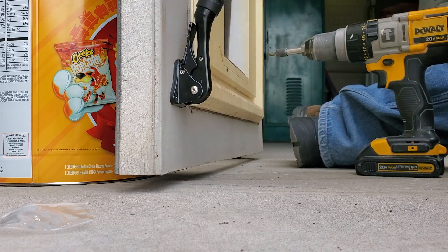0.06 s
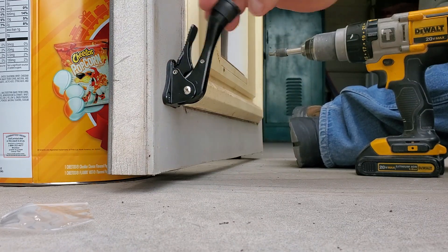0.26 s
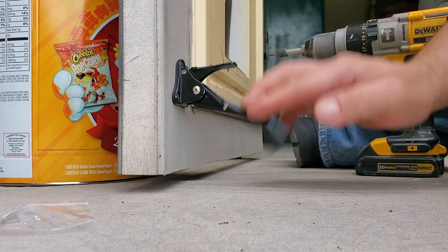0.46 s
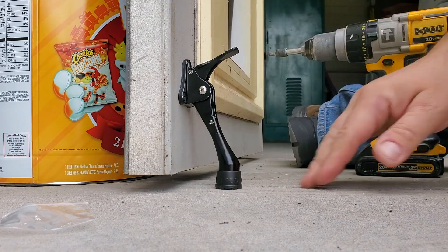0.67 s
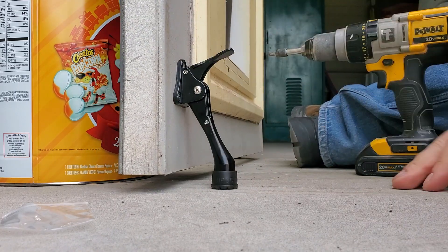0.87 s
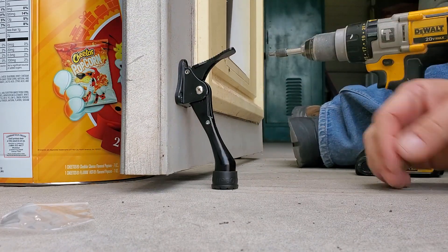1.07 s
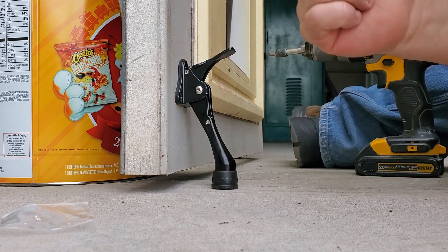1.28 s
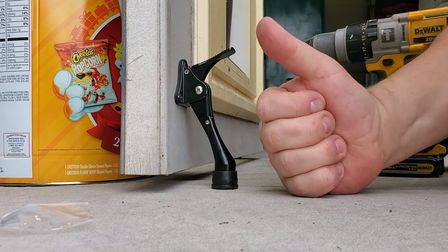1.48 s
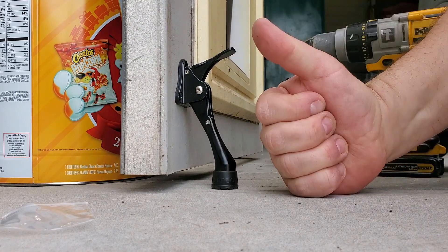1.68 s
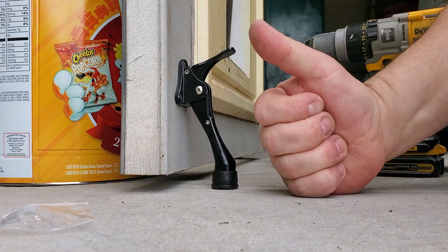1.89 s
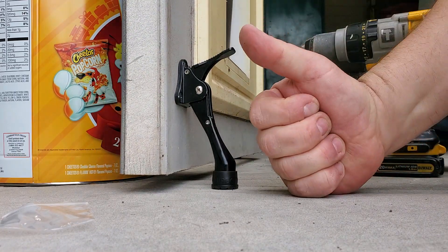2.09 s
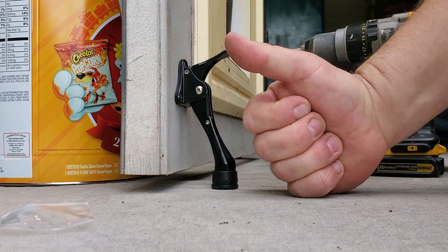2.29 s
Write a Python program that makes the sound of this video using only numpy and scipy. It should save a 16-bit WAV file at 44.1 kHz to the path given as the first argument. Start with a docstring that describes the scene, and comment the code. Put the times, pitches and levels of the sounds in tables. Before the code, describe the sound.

Close, dry recording of a spring-loaded door stop: a light metallic snap, a hard clack shaking the door, another snap, faint hand brushing, then a dull fist pat with tiny grit ticks, above a low wavering engine hum.

```python
"""By a door on a concrete floor, a spring-loaded metal door stop is flipped down.
Its lever snaps and rattles, the foot slams on the concrete and shakes the door, the lever snaps again.
Metal and door are decaying sines set off by clicks; cracks, a brushing hand and a rustle are shaped noise.
A fist lands on the floor with rings, a puff of noise and ticks of grit.
Far traffic rumbles as banded noise, with an engine hum of two wavering sines that sinks slowly."""
import sys
import numpy as np
from scipy import signal
from scipy.io import wavfile

SR = 44100
rng = np.random.default_rng(int(sys.argv[2]) if len(sys.argv) > 2 else 0)


def master(y):
    """Save y as 16-bit WAV."""
    cut = np.clip(np.atleast_2d(y).T, -1, 1)
    pcm = np.round(cut * 32767)  # scale
    wavfile.write(sys.argv[1], SR, pcm.astype(np.int16))


def decibels_to_gain(level_db):
    """Convert a level in decibels to a linear amplitude gain (20 dB per decade)."""
    exponent = np.asarray(level_db, float) / 20
    return 10 ** exponent


N = 102885  # length in samples

# metal touching metal or floor: start_s, strength_db (relative), favoured_pitch_hz,
# steel_ping_db (extra), crack_treble_db (extra)
METAL_CONTACTS = [(0.4284, -16.5, 3770, 14, 11.5), (0.4300, -16, 690, -5, 10), (0.4405, -27, 1500, -3, 19),
                  (0.4504, -22.5, 2550, 4, 13.5), (0.4630, -28.5, 2800, 6, 11), (0.5010, -46, 3000, 10, 22),
                  (0.5696, -9.5, 2700, -8, 3), (0.5725, -13.5, 1850, -11, 1), (0.5770, -15, 900, -17, -4),
                  (0.583, -20.5, 1950, -12, -5), (0.5880, -22, 495, -15, -12), (0.5940, -22, 1500, -8, 4),
                  (0.6020, -27.5, 900, -8, 9), (0.6130, -24, 900, -5, 7), (0.6200, -29, 600, -10, 7),
                  (0.6280, -34, 900, -10, -6), (0.7069, -13, 3060, -0.5, 5), (0.7080, -11, 1000, -24, -15),
                  (0.7100, -14.5, 1980, -19, -17), (0.7190, -35, 800, -16, -6), (0.7330, -32, 900, -6, -2),
                  (0.7577, -28, 3485, -4, 2), (0.7611, -21, 1550, -18, -12), (0.767, -30.5, 1000, -18, -12)]
# how far the metal sounds lean to one side: pitch_hz, left_minus_right_db
METAL_SIDES = [(60, 0.5), (110, 0.5), (200, 22), (380, 1.5), (700, 1), (1290, 6), (2380, 6), (4400, 8.0),
               (8120, 0.5), (15000, -3.5)]


def rms_one(x):
    """Scales a sound to an rms of 1."""
    return x / np.sqrt(np.mean(x ** 2) + 1e-20)


def in_time(rows):
    """Draws straight lines through rows of (time in s, values) and gives one curve per value."""
    seconds, *columns = np.transpose(rows)
    return [np.interp(np.arange(N) / SR, seconds, column) for column in columns]


def at_hz(points, hz):
    """Reads a (pitch in Hz, value) curve at one pitch, on a logarithmic pitch scale."""
    point_hz, values = np.transpose(points)
    return np.interp(np.log(hz), np.log(point_hz), values)


def drift(rate_hz):
    """Slow chance with spread 1: noise smoothed twice, made at a fortieth of the sample rate."""
    keep = np.exp(-2 * np.pi * rate_hz * 40 / SR)
    noise = rng.standard_normal(N // 40 + 2002)
    slow = signal.lfilter([1], [1, -2 * keep, keep * keep], noise)[2000:]  # skip the start-up
    return np.interp(np.arange(N) / 40, np.arange(len(slow)), rms_one(slow))


def clicks(start_s, level_db, factor=0.96):
    """Single-sample pulses on near silence; a complex factor sets the phase of a ring."""
    out = np.full(N, 1e-18, dtype=np.result_type(factor))
    np.add.at(out, (np.asarray(start_s) * SR).astype(int), decibels_to_gain(level_db) * factor)
    return out


def dying(x, t60_s):
    """Each click starts an exponential decay that falls 60 dB in t60_s."""
    return signal.lfilter([1], [1, -decibels_to_gain(-60 / (t60_s * SR))], x)


def ring(x, hz, t60_s, turn=0., swell_t60_s=None):
    """A decaying sine per click, swelling in if asked; the right ear hears it turned in phase (radians)."""
    spin = np.exp(2j * np.pi * hz / SR)
    wave = signal.lfilter([1], [1, -decibels_to_gain(-60 / (t60_s * SR)) * spin], x)
    if swell_t60_s:
        keep = decibels_to_gain(-60 / (swell_t60_s * SR))
        wave = signal.lfilter([1 - keep], [1, -keep * spin], wave)
    return np.array([wave.imag, (wave * np.exp(1j * turn)).imag])


def pan(left_minus_right_db):
    """Gains for left and right, half the difference each."""
    return decibels_to_gain(np.array([[left_minus_right_db / 2], [-left_minus_right_db / 2]]))


def bands(spectrum, alike):
    """Yields centre and stereo noise of each quarter-octave band; all together have rms near 1."""
    edges = 28.5 * 2 ** np.arange(0, 9.3, .25)
    centres = np.sqrt(edges[1:] * edges[:-1])
    white = rng.standard_normal((2, 2, N))  # neighbouring bands use different noise
    total = np.sqrt(np.sum(decibels_to_gain(at_hz(spectrum, centres)) ** 2 * np.diff(edges)) * 2 / SR)
    for k, hz in enumerate(centres):
        if spectrum[0][0] < hz < spectrum[-1][0]:
            sos = signal.butter(2, edges[k:k + 2], "band", fs=SR, output="sos")
            mid, side = signal.sosfilt(sos, white[k % 2])
            likeness = np.clip(alike(hz), -1, 1)  # 1: same in both ears, -1: opposite
            stereo = np.sqrt(1 + likeness) * mid + np.sqrt(1 - likeness) * side * [[1], [-1]]
            yield hz, decibels_to_gain(at_hz(spectrum, hz)) / total * stereo / np.sqrt(2)


def traffic():
    """Far traffic is patchy broad rumble: noise bands that drift in level, together and each alone."""
    # colour of the rumble: pitch_hz, level_db (per Hz, relative)
    rumble_colour = [(25, -47), (38, -17), (50, -3), (108, -3.5), (131, -6.5), (167, -9.5), (215, -17.5),
                     (313, -17.5), (450, -23), (787, -23.5), (1500, -28.5), (2670, -35), (4500, -50.5),
                     (6800, -51.5), (8000, -81.5), (10000, -57), (12200, -62.5), (14500, -64), (17000, -51)]
    # overall level before the drift and hiss: time_s, level_db
    rumble_level = [(0, -35.5), (.6, -31.5), (1.2, -36.5), (1.8, -37), (2.33, -33)]
    # how alike the two ears are: pitch_hz, likeness (-1 to 1)
    ear_likeness = [(60, 0.96), (180, 0.96), (550, 0.18), (1650, -0.47), (4970, 0.1), (15000, -1)]
    # lean to one side: pitch_hz, left_minus_right_db
    rumble_sides = [(60, 1), (400, 1), (1300, 4), (4400, 7), (15000, -6)]
    # extra level of the tyre hiss above 600 Hz: time_s, level_db
    tyre_hiss = [(0, 1.64), (.7, -1.4), (1.3, 1.25), (1.8, 1.64), (2.33, 2)]
    together = drift(1.6)
    hiss_db = in_time(tyre_hiss)[0]
    rumble = 0
    for hz, noise in bands(rumble_colour, lambda hz: at_hz(ear_likeness, hz)):
        level_db = 0.2 * together + 1.3 * drift(5.0) + hiss_db * (hz > 600)
        rumble = rumble + noise * pan(at_hz(rumble_sides, hz)) * decibels_to_gain(level_db)
    return decibels_to_gain(in_time(rumble_level)[0]) * rumble


def engine():
    """A far engine hums at its first two orders, each wavering in level and pitch."""
    # middle course of the hum, before wavering: time_s, pitch_hz, first_order_db, second_order_db
    engine_course = [(0, 57, -38.5, -35.5), (.45, 55.76, -42, -33), (.9, 54.22, -42, -41.5),
                     (1.1, 54, -33, -30), (1.3, 54.33, -32, -41), (1.55, 54.17, -36, -33),
                     (1.85, 53, -35, -37), (2.33, 51, -34, -42)]
    waver_db, waver_hz = 4.5, 2.49
    pitch_hz, *orders_db = in_time(engine_course)
    hum = 0
    for order, level_db in enumerate(orders_db, 1):
        loudness = decibels_to_gain(level_db + waver_db * drift(2.9))
        order_hz = order * pitch_hz + waver_hz * drift(5.85)
        hum = hum + loudness * np.sin(2 * np.pi * np.cumsum(order_hz) / SR)
    return hum


def brushing():
    """Skin and cloth brush the floor: bright noise in short strokes, each with its own tilt."""
    # strokes: start_s, length_s, level_db (relative, at 7000 Hz), tilt_db_per_octave
    brush_strokes = [(-.02, 0.04, -56, 1), (0.273, 0.1, -67, -14), (0.483, 0.067, -59.5, 7.5),
                     (0.557, .015, -54, -13.5), (0.643, 0.27, -63, 5), (1.478, 0.011, -44, -4),
                     (0.826, 0.024, -74, -3), (0.922, 0.062, -61.5, 2.5), (1.033, 0.03, -45.5, -1.5),
                     (1.064, 0.045, -50, 3), (1.123, 0.036, -58.5, 1.5), (1.159, 0.023, -52, 0),
                     (1.195, 0.32, -62, -2.5), (1.48, 0.033, -65, 13), (1.609, 0.0033, -55, -5.5),
                     (1.629, 0.0019, -47, -8), (1.705, 0.089, -58.5, 1), (1.865, 0.072, -64.5, -4)]
    # colour of the noise: pitch_hz, level_db (per Hz, relative)
    brush_colour = [(900, -28), (1500, -1.5), (3000, 0.5), (5500, 1), (6900, -1), (8200, -18.5),
                    (10000, -2.5), (12000, -4), (14000, -6), (15700, -5), (17000, -30)]
    start_s, length_s, level_db, tilt_db = np.transpose(brush_strokes)
    # longer strokes rise and fall more slowly, up to a length of 0.05 s
    rise_s = 0.0011 + 0.15 * np.minimum(length_s, .05)
    fall_s = 0.0018 + 0.24 * np.minimum(length_s, .05)
    since_start = np.arange(N) / SR - start_s[:, None]
    since_end = np.maximum(since_start - length_s[:, None], 0)
    strokes = np.clip(since_start / rise_s[:, None], 0, 1) * np.exp(-since_end / fall_s[:, None])
    out = 0
    for hz, noise in bands(brush_colour, lambda hz: .2):
        loudness = decibels_to_gain(level_db + tilt_db * np.log2(hz / 7000)) @ strokes
        out = out + noise * decibels_to_gain(0.51 * drift(22.0)) * loudness
    return out


def rustle():
    """A soft rustle high in the treble: a band of noise that swells and fades."""
    # swells: middle_s, width_s, level_db
    rustle_swells = [(.33, 0.072, -72.5), (1.57, 0.048, -75), (1.70, 0.052, -71), (1.76, 0.038, -64),
                     (1.91, 0.042, -68), (2.05, 0.059, -74.5), (2.25, .08, -73.5)]
    centre_hz, breadth_hz = 12030, 1840
    middle_s, width_s, level_db = np.transpose(rustle_swells)
    widths_away = (np.arange(N) / SR - middle_s[:, None]) / width_s[:, None]
    loudness = decibels_to_gain(level_db) @ np.exp(-.5 * widths_away ** 2)
    limits_hz = [centre_hz - breadth_hz / 2, centre_hz + breadth_hz / 2]
    sos = signal.butter(2, limits_hz, "band", fs=SR, output="sos")
    return loudness * rms_one(signal.sosfilt(sos, rng.standard_normal((2, N))))


def metal_rings():
    """Every contact rings the bracket, door skin, lever and spring as decaying sines at chance phases."""
    # bracket and door skin: pitch_hz, level_db (relative), t60_s
    body_modes = [(462, -0.5, 0.1), (555, -11, .05), (690, 1, 0.038), (732, -2.5, 0.087), (900, -3.5, 0.01),
                  (1072, -0.5, 0.055), (1128, -15, 0.036), (1320, -15, 0.026), (1460, -3, 0.023),
                  (1918, 1, 0.046), (2005, 4, 0.024), (2340, -12.5, 0.055), (2988, -5.5, 0.034),
                  (3240, 2.5, 0.023), (3426, -6.5, .02), (3677, -31, 0.046), (4280, -5, 0.024),
                  (4570, -8, 0.054), (5310, -5, .025), (5860, -15, 0.023), (6650, -3.5, .04)]
    # pitches of the steel lever and spring: pitch_hz
    steel_pitches = [9930, 10850, 12295, 14450, 15570]
    # the same lever and spring modes: level_db (relative), t60_s
    steel_decays = [(-24, .04), (-37, 0.017), (-10.5, 0.057), (-21, 0.099), (-9, 0.041)]
    favour_db, scatter_db = 6.5, 1.2  # loss per octave squared off the favoured pitch; chance spread
    phase_spread, phase_full_hz = 1.55, 1500  # radians between the ears, reached from that pitch up
    press_t60_s = 0.0037  # a contact presses for a moment, so the modes swell in; shorter above 1000 Hz
    start_s, strength_db, favoured_hz, ping_db, _ = np.transpose(METAL_CONTACTS)
    modes = body_modes + [(hz, *row) for hz, row in zip(steel_pitches, steel_decays)]
    luck = rng.standard_normal((len(start_s), len(modes)))
    phase = np.exp(2j * np.pi * rng.random(luck.shape))
    out = 0
    for k, (hz, level_db, t60_s) in enumerate(modes):
        if k < len(body_modes):
            colour_db = -favour_db * np.log2(hz / favoured_hz) ** 2
        else:
            colour_db = ping_db
        turn = phase_spread * min(1, hz / phase_full_hz) * rng.choice([-1, 1])
        force_db = strength_db - 4.5 + level_db + colour_db + scatter_db * luck[:, k]
        force = clicks(start_s, force_db, phase[:, k])
        wave = ring(force, hz, t60_s, turn, press_t60_s * min(1, 1000 / hz))
        out = out + pan(at_hz(METAL_SIDES, hz)) * wave
    return out


def metal_cracks():
    """Every contact cracks: a short burst of noise, with a quieter tail that is longest in the bass."""
    # colour of the crack: pitch_hz, level_db (per Hz, relative)
    crack_colour = [(300, -2), (700, 6.5), (2000, -3), (2600, -8.5), (3300, -4.5), (6500, -15), (8200, -24),
                    (10500, -19.5), (12300, -11), (13500, -24), (15700, -16), (17000, -34)]
    # how long the tail lasts: pitch_hz, t60_s
    tail_decay = [(300, 0.29), (2000, 0.16), (6000, 0.13), (15000, 0.033)]
    crack_db, crack_t60_s, tail_db = -6, 0.016, -20.5
    start_s, strength_db, _, _, treble_db = np.transpose(METAL_CONTACTS)
    out = 0
    for hz, noise in bands(crack_colour, lambda hz: 0.27):
        hit = clicks(start_s, strength_db + treble_db * (hz > 7300))
        burst = decibels_to_gain(crack_db) * dying(hit, crack_t60_s)
        tail = decibels_to_gain(tail_db) * dying(hit, at_hz(tail_decay, hz))
        out = out + pan(at_hz(METAL_SIDES, hz)) * noise * (burst + tail)
    return out


def door_stop():
    """The metal contacts, rings and cracks together, with the bass below 344 Hz taken out."""
    sos = signal.butter(4, 344, "high", fs=SR, output="sos")
    return signal.sosfilt(sos, metal_rings() + metal_cracks())


def door_leaf():
    """Slams shake the door leaf: its low modes swell in and die away."""
    # slams: start_s, level_db (relative)
    door_slams = [(0.573, -20), (0.587, -22.5), (0.612, -24)]
    # modes of the leaf: pitch_hz, level_db (relative), t60_s
    leaf_modes = [(83.4, -5.5, 0.48), (115, -3.5, 0.089), (146.4, 1.5, 0.16), (179.4, 1.5, 0.226),
                  (223.4, 0, 0.11), (253, -0.5, .2), (285.2, -15, 0.28), (356.4, -8.5, 0.16), (426, -3, .1)]
    swell_cycles = 4.6  # t60 of the swell, in cycles of each mode
    start_s, slam_db = np.transpose(door_slams)
    out = 0
    for hz, level_db, t60_s in leaf_modes:
        out = out + ring(clicks(start_s, slam_db + level_db), hz, t60_s, swell_t60_s=swell_cycles / hz)
    return out


def pats():
    """Flesh lands on concrete: a low push, a short ringing slap and a puff of noise."""
    # touches: start_s, slap_db, low_push_db (both relative)
    floor_pats = [(1.4800, -29.5, -46), (1.4818, -27.5, -30.5), (1.4838, -24.5, -18)]
    # rings, the first two for the push, the others for the slap: pitch_hz, level_db (relative), t60_s
    pat_rings = [(96, 0.5, 0.082), (166, 5, 0.041), (298, -3, 0.027), (483, -4.5, 0.021), (600, 0.5, 0.02),
                 (810, 1.5, 0.011), (1000, -4.5, 0.023), (1130, -19, 0.011), (1550, -4, 0.018),
                 (1747, -10, 0.034)]
    # colour of the puff: pitch_hz, level_db (per Hz, relative)
    puff_colour = [(250, -10), (500, -7), (1000, -14), (1700, 1.5), (2500, -20.5), (4500, -23.5),
                   (7900, -59), (11800, -17), (16000, -28), (17000, -40)]
    puff_db, puff_t60_s = -0.1, 0.032  # level beside the slap
    start_s, slap_db, push_db = np.transpose(floor_pats)
    out = 0
    for k, (hz, level_db, t60_s) in enumerate(pat_rings):
        is_push = k < 2
        # the push starts at phase zero, the slap at chance phases
        phase = np.exp(2j * np.pi * rng.random(len(start_s)) * (not is_push))
        force_db = level_db + (push_db if is_push else slap_db)
        out = out + ring(clicks(start_s, force_db, phase), hz, t60_s)
    puff = dying(clicks(start_s, slap_db + puff_db), puff_t60_s)
    # a second short decay softens the onset; the factor roughly undoes its gain
    puff = dying(puff, 0.0034) * 7 / (0.0039 * SR)
    return out + puff * sum(noise for _, noise in bands(puff_colour, lambda hz: .5))


def grit():
    """Grit ticks under the fist: small decaying sines that swell in quickly."""
    # ticks: start_s, level_db (relative), pitch_hz, t60_s
    grit_ticks = [(1.627, -44, 3100, 0.027), (1.6267, -50, 4570, .02), (1.662, -44.5, 2705, 0.034)]
    return sum(ring(clicks([start_s], level_db), hz, t60_s, 1., 0.0061)
               for start_s, level_db, hz, t60_s in grit_ticks)


def scene():
    """Street, hand, rustle, door stop and shaken door added up."""
    street = traffic() + engine()
    hand = brushing() + pats() + grit()
    return street + hand + rustle() + door_stop() + door_leaf()


def low_pass(x):
    """Removes everything above the highest recorded frequency."""
    return signal.sosfilt(signal.butter(12, 16950, fs=SR, output="sos"), x)


def record(dry):
    """The microphone drops the deepest bass, below 30 Hz, and the top is cut from 16800 Hz."""
    low_cut = signal.butter(2, 30, "high", fs=SR, output="sos")
    top_cut = signal.cheby2(10, 60, 16800, fs=SR, output="sos")
    mix = signal.sosfilt(top_cut, signal.sosfilt(low_cut, dry))
    return low_pass(mix)


dry = scene()
out = record(dry)
master(out)
```